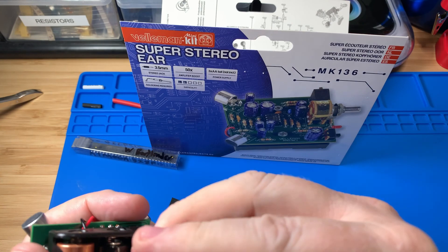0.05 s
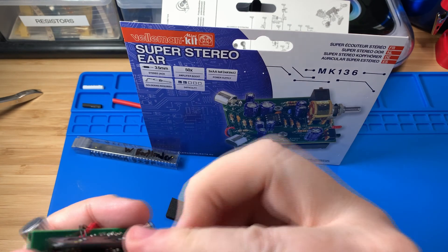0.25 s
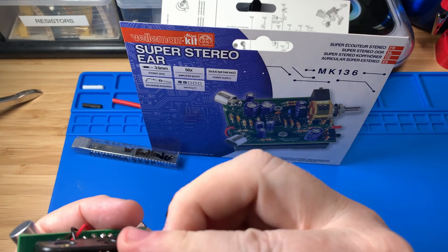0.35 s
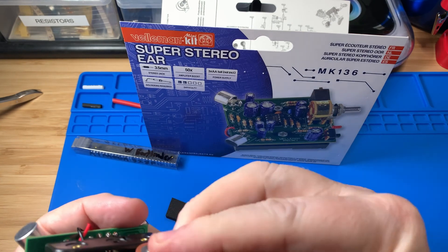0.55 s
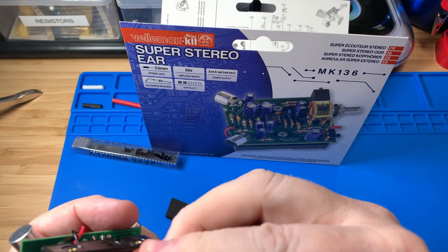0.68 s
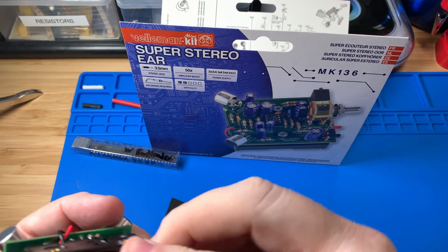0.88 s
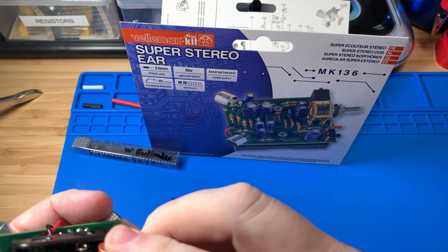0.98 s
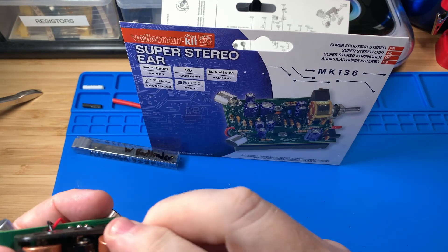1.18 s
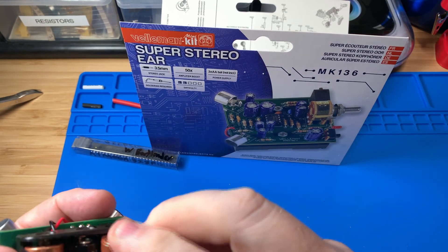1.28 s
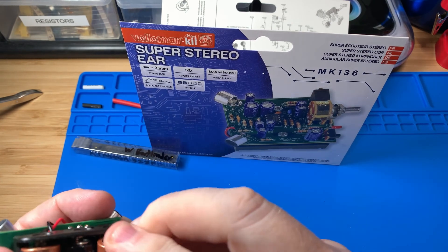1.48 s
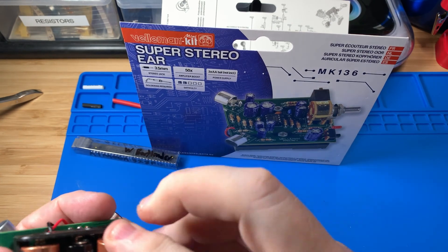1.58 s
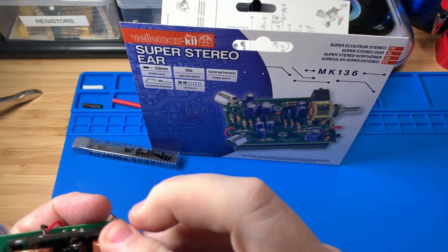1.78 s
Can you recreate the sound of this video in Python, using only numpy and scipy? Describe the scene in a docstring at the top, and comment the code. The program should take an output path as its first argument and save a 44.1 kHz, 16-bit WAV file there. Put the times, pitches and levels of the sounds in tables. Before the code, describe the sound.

Close in a small quiet room, a battery holder clacks hard twice in the first second, with short scrapes and dull finger rustle, then softer ticks and a springy ping follow above a wavering low hum.

```python
"""A small room: batteries are pushed into a plastic holder close to the microphone, a little to its right.
They scrape along the shell (random slips), tick against it (clicks with noisy rings) and twice snap home
(a click, flexing shell, ringing modes and a thud). Decaying sines make the board knock; swelling ones
make the contact spring twang. Fingers rustle dully in shaped noise. Dense decaying noise gives the room's
answer; a low hum, a wavering sine with odd overtones, swells and sags over soft room noise."""
import sys
import numpy as np
from scipy import signal
from scipy.fft import rfft, irfft, next_fast_len
from scipy.io import wavfile
from scipy.ndimage import map_coordinates

SR = 44100
rng = np.random.default_rng(int(sys.argv[2]) if len(sys.argv) > 2 else 0)


def transcribe(signal):
    """Save signal, clipped to [-1, 1], as a 16-bit WAV file at the path in sys.argv[1]."""
    frames = np.atleast_2d(signal).T
    limited = np.clip(frames, -1, 1)
    pcm = np.round(limited * 32767).astype(np.int16)
    wavfile.write(sys.argv[1], SR, pcm)


N = 81585  # length in samples

# Spectrum of the plastic shell when struck, relative: frequency_hz, level_db
STRUCK_SHELL = [(60, -24), (200, -23), (600, -22), (1300, -22.5), (2100, -18), (2550, -15.5), (2850, 6),
                (3800, -3), (4500, 5.5), (4900, -6.5), (6500, -11), (7800, -10), (8600, -11), (9800, -6.5),
                (11000, -11.5), (12300, -9.5), (13600, -12), (15500, -11), (17000, -46.5)]


def amp(db):
    """Decibels are twenty times the logarithm of an amplitude ratio; this returns the ratio."""
    return 10 ** (np.asarray(db) / 20)


def unit(x):
    """Normalisation by the root of the mean power gives rms 1."""
    return x / np.sqrt(np.mean(x ** 2) + 1e-20)


def along(points, hz):
    """Linear interpolation of (frequency_hz, value) points over logarithmic frequency."""
    f, v = np.transpose(points)
    return np.interp(np.log(hz + 1), np.log(f + 1), v)


def wobble(rate):
    """A cubic spline through random knots, rate of them a second, makes a smooth random curve."""
    knots = rng.standard_normal(int(N * rate / SR) + 4)
    return map_coordinates(knots, [np.arange(N) * rate / SR])


def filtered(x, response):
    """Linear filtering: the spectrum of x is multiplied by a complex response of frequency."""
    size = next_fast_len(N + SR // 2)
    spectrum = rfft(x, size) * response(np.fft.rfftfreq(size, 1 / SR))
    return irfft(spectrum, size)[..., :N]


def add(track, s, sound):
    """Superposition: a sound is summed into the track from time s, in seconds."""
    part = track[round(s * SR):][:len(sound)]
    part += sound[:len(part)]


def fade(t, t60):
    """Exponential decay by 60 dB in t60 seconds."""
    return np.exp(-np.log(1000) * t / t60)


def colour(spectrum, tone_db, size=2048):
    """Minimum phase: a folded cepstrum turns a level spectrum into a causal response of energy 1."""
    # Where a contact's colour is raised or lowered: frequency_hz
    tone_points_hz = [1500, 2900, 6000, 9500, 13500]
    body_low_hz, body_high_hz = 3575, 4509  # the shell's main band, left at 0 dB
    hz = np.fft.rfftfreq(size, 1 / SR)
    tone = sorted([*zip(tone_points_hz, tone_db), (body_low_hz, 0), (body_high_hz, 0)])
    level_db = along(spectrum, hz) + along(tone, hz)
    cepstrum = irfft(np.log(amp(level_db)))
    cepstrum[1:size // 2] *= 2
    cepstrum[size // 2 + 1:] = 0
    response = irfft(np.exp(rfft(cepstrum)))
    return response / np.linalg.norm(response)


def blow(body, t60, ring_db):
    """Impulsive excitation: a click and dense decaying noise drive the body's impulse response."""
    t = np.arange(SR // 8) / SR
    push = rng.standard_normal(len(t)) * fade(t, t60)
    push *= amp(ring_db) / np.linalg.norm(push)  # ring energy relative to the click
    push[0] += 1
    hit = signal.fftconvolve(push, body)[:len(t)]
    return hit / np.linalg.norm(hit) * np.sqrt(SR / 1000)  # energy of 1 ms at rms 1


def snaps():
    """Modal response to impact: a hard contact, a flexing shell, ringing modes and a thud in the hand."""
    # A battery snaps home: start_s, level_db, thud_db (relative to level_db),
    # then relative tone_db at 1500, 2900, 6000, 9500 and 13500 Hz
    snap_events = [(0.2569, -3.5, -44.5, 4, 2.2, 2.3, 1, 7),
                   (0.8596, -7, -30.5, -3.5, 1.9988, 1.65, 1.5, -10.5)]
    # Modes of the holder after a snap: frequency_hz, level_db (relative to the snap), t60_s
    holder_modes = [(550.8, -34.5, .03), (2885, -28.5, .025), (3496.6, -19, 0.043), (3760, -26, .035),
                    (4297.9, -33, 0.023), (6420, -32, .04), (7300, -30.5, 0.026)]
    crack_db, noise_t60_s, noise_ring_db = -3, 0.013, -2.5
    # the shell flexes just after the first contact
    flex_s, flex_width_s, flex_hz, flex_db = 0.00069802, 0.00042, 3741.5, 1
    thud_hz, thud_peak_s = 142.5, 0.006

    out, t = np.zeros(N), np.arange(SR // 8) / SR
    flex_envelope = np.exp(-((t - flex_s) / flex_width_s) ** 2)
    flex = flex_envelope * np.sin(2 * np.pi * flex_hz * (t - flex_s))
    thud_envelope = t / thud_peak_s * np.exp(1 - t / thud_peak_s)
    thud = thud_envelope * np.sin(2 * np.pi * thud_hz * t)
    ring = sum(amp(mode_db) * np.sin(2 * np.pi * hz * t) * fade(t, t60)
               for hz, mode_db, t60 in holder_modes)
    for s, db, thud_db, *tone_db in snap_events:
        crack = blow(colour(STRUCK_SHELL, tone_db), noise_t60_s, noise_ring_db)
        snap = amp(crack_db) * crack + amp(flex_db) * flex + ring + amp(thud_db) * thud
        add(out, s, amp(db) * snap)
    return out


def board():
    """Damped free vibration: the circuit board knocks, short and hollow, under the firmer pushes."""
    # Knocks of the board: start_s, pitch_hz, level_db, t60_s
    board_knocks = [(0.216, 996.9, -33.5, 0.01911), (.2568, 617.3, -28, 0.029345),
                    (0.8594, 962.6, -23.5, 0.019)]
    out, t = np.zeros(N), np.arange(SR // 8) / SR
    for s, hz, db, t60 in board_knocks:
        add(out, s, amp(db) * np.sin(2 * np.pi * hz * t) * fade(t, t60))
    return out


def ticks():
    """Impact excitation: lighter contacts drive the same shell, each with its own colour and decay."""
    # Light knocks of battery on shell: start_s, level_db, t60_s (of the driving noise),
    # then relative tone_db at 1500, 2900, 6000, 9500 and 13500 Hz
    tick_events = [(0.2173, -21.5, 0.01847, 22, 2, 12, 5, 0), (0.2291, -20, 0.0062, 14.5, 0, 10, 5, 24),
                   (.464, -42, 0.013, -6, -8.5, 2, 6, 1.5),
                   (.5738, -28.5, 0.008413, 0, -4.5, -9.5, -8.5, -2.5),
                   (.6099, -30, 0.008455, 9, -0.5, -9, -15.5, -5),
                   (.7445, -48.5, .02, -5, -0.5, -5, -0.5, -3), (1.016, -44, 0.02883, 7, 8, 13, 0.5, 3),
                   (1.3592, -40, 0.015367, -7.5, 13, -4.5, 18, 0),
                   (1.4035, -34.5, 0.018, -12, -8, -4, -0.5, -4.5), (1.406, -37, 0.018, 4, -0.5, -2, 6, -3),
                   (1.575, -25, 0.034795, 13.5, 2.5, 3.5, 14.5, 8),
                   (1.7728, -48, 0.0057, 2, -14, 7.5, -2, -3.5), (1.7836, -31, 0.0035, 9, -16.5, 15, 19, 1)]
    out = np.zeros(N)
    for s, db, t60, *tone_db in tick_events:
        add(out, s, amp(db) * blow(colour(STRUCK_SHELL, tone_db), t60, ring_db=6.5))
    return out


def scrapes():
    """Friction as many tiny random slips, coloured by the shell, under a stroke that rises and falls."""
    # A battery slides in the shell: peak_s, rise_s, fall_s (each to 1/e of the peak), level_db,
    # treble_db (relative, at 9500 Hz), top_db (relative, at 13500 Hz)
    slides = [(0.011, 0.027, 0.017, -54.5, -2, -9), (0.086, 0.0045, 0.01845, -60.5, 0, -3.5),
              (0.2014, .0075, 0.004409, -26.5, 4.5, 2), (.227, 0.003302, 0.003, -29, -4, 9.5),
              (.254, 0.01071, .004, -36.5, -16, 0.5), (0.486, 0.006716, 0.014826, -45.5, 1, -4.5),
              (0.507, 0.018915, 0.018274, -47, 0, -2.5), (0.594, .025, 0.031, -54, -19.5, 0.5),
              (0.691, 0.0064, .02, -57, 2.5, -2), (0.751, 0.0075, 0.034, -56, -3, -3),
              (.805, 0.0032, .006, -58, 18.5, -10.5), (0.857, 0.0044, 0.00902, -30.5, 2.5, -14),
              (0.88, 0.011, .025, -44.5, -5, -5), (0.946, 0.036, 0.019, -59, 3.5, -8.5),
              (1.231, 0.003295, 0.00895, -57.5, -0.5, 6.5), (1.253, 0.00546, 0.015, -57.5, -10.5, -4),
              (1.359, .004, 0.0064, -48, 1, 3.5), (1.412, .015, .025, -56, -34.5, -8.5),
              (1.59, 0.013, 0.023953, -52, -1.5, 5), (1.784, 0.008593, 0.01188, -57.5, -5.5, -2)]
    # Spectrum of the shell when rubbed, relative: frequency_hz, level_db
    rubbed_shell = [(100, -24), (1500, -23), (2300, -12), (3000, -6), (3700, -4), (4150, -1), (4550, -3),
                    (5000, -5), (5700, -12), (6700, -7.5), (8600, -16.5), (9800, -12.5), (12000, -11),
                    (13600, -18.5), (15200, -12.5), (17000, -48)]
    slips_per_s, noise_share = 1500, 0.75  # smooth noise relative to slips of rms 1

    out, t = np.zeros(N), np.arange(N) / SR
    for s, rise, fall, db, treble_db, top_db in slides:
        slips = unit(rng.standard_normal(N) * (rng.random(N) < slips_per_s / SR))
        friction = slips + noise_share * rng.standard_normal(N)
        body = colour(rubbed_shell, (0, 0, 0, treble_db, top_db))
        rub = unit(signal.oaconvolve(friction, body)[:N])
        stroke = np.exp(-np.abs((t - s) / np.where(t < s, rise, fall)) ** 1.0976)
        out += amp(db) * stroke * rub
    return out


def spring():
    """Resonance of a coil: it sings up briefly as a battery drags over it, then rings on faintly."""
    # Twangs of the contact spring: start_s, pitch_hz, level_db
    twang_events = [(1.405, 4497, -36.5), (1.5767, 4483, -22.5)]
    swell_peak_s, swell_width_s = 0.0018, 0.004
    tail_t60_s, tail_db = 0.0334, -20  # level relative to the swell
    roughness_rad = 0.39  # random phase, per unit of wobble

    out, t = np.zeros(N), np.arange(SR // 4) / SR
    swell = np.exp(-((t - swell_peak_s) / swell_width_s) ** 2)
    envelope = swell + amp(tail_db) * fade(t, tail_t60_s)
    for s, hz, db in twang_events:
        phase = 2 * np.pi * hz * t + roughness_rad * wobble(802.6)[:len(t)]
        add(out, s, amp(db) * envelope * np.sin(phase))
    return out


def hands():
    """Spectrally shaped noise: the dull rustle of fingers working on the holder."""
    # Spectrum of the rustle, relative: frequency_hz, level_db
    rustle_spectrum = [(30, -8.5), (100, -3.5), (170, 0.5), (300, -8), (550, -11.5), (1200, -23.5),
                       (3000, -42.5)]
    # Course of the rustle before its random wavering: time_s, level_db
    rustle_course = [(0, -45), (0.129, -61), (.25, -45), (.4, -58.5), (.55, -52), (.78, -66), (.87, -47),
                     (.95, -73.5), (1.85, -70)]
    rustle = unit(filtered(rng.standard_normal(N), lambda hz: amp(along(rustle_spectrum, hz))))
    level_db = np.interp(np.arange(N) / SR, *np.transpose(rustle_course))
    return rustle * amp(level_db + 1.5 * wobble(30))


def room(x):
    """Reverberation as decaying noise: quick bench reflections, then a tail whose decay varies with pitch."""
    # Decay of the room's tail: frequency_hz, t60_s
    tail_decay = [(200, .25), (1500, 0.21), (3000, .19), (4300, 0.27), (7000, 0.25), (15000, 0.11)]
    # Colour of the sound sent into the room, relative: frequency_hz, level_db
    sent_colour = [(300, -9), (1200, 0), (2500, 1), (3200, 0), (4300, -1.5), (6500, -2), (14000, -5.5)]
    tail_db, bench_db, bench_t60_s = -21.5, -11, 0.052

    hz, t, bands = signal.stft(rng.standard_normal((2, SR // 2)), SR, nperseg=256)
    bands = bands * fade(t, along(tail_decay, hz)[:, None])
    tail = signal.istft(bands, SR, nperseg=256)[1]
    t = np.arange(tail.shape[1]) / SR
    early = rng.standard_normal(tail.shape) * fade(t, bench_t60_s)
    # both parts are scaled by the energy of their left channel
    answer = amp(tail_db) * tail / np.linalg.norm(tail[0])
    answer += amp(bench_db) * early / np.linalg.norm(early[0])
    sent = filtered(x, lambda hz: amp(along(sent_colour, hz)))
    return signal.fftconvolve(sent[None], answer, axes=1)[:, :N]


def hum():
    """Harmonic synthesis: a wavering low tone swells and sags over faint odd overtones of steady level."""
    # Course of the fundamental, rms before the stereo balance: time_s, level_db
    hum_course = [(0.0, -42.5), (0.164, -44.5), (0.2, -57.5), (0.246, -42), (0.282, -51), (0.328, -46),
                  (0.704, -39.5), (0.85, -53.5), (0.886, -48), (0.926, -68.5), (1.046, -38.5), (1.076, -45),
                  (1.298, -41.5), (1.328, -54), (1.52, -41.5), (1.612, -45), (1.73, -43), (1.85, -50.5)]
    # Overtones, rms before the stereo balance: multiple, level_db
    odd_overtones = [(3, -62), (5, -71)]
    pitch_hz, waver_hz, left_db = 56.029, 0.46, -2.0721  # the right channel takes the opposite gain

    phase = 2 * np.pi * np.cumsum(pitch_hz + waver_hz * wobble(9.8)) / SR
    level_db = np.interp(np.arange(N) / SR, *np.transpose(hum_course))
    tone = amp(level_db) * np.sin(phase)
    for multiple, db in odd_overtones:
        tone += amp(db) * np.sin(round(multiple) * phase + wobble(5))  # phase wanders
    return np.sqrt(2) * tone * amp([[left_db], [-left_db]])


def air():
    """Partial coherence: mid and side noises mix into room noise alike in both channels in the bass only."""
    # Spectrum of the room noise, relative: frequency_hz, level_db
    air_spectrum = [(20, -17), (45, 2.5), (90, 6), (150, -5.5), (260, -4.5), (380, -20.5), (600, -15.5),
                    (950, -15.5), (1400, -28.5), (2500, -32.5), (4500, -37.5), (7000, -38), (8600, -47),
                    (11000, -29.5), (13600, -46), (15200, -36.5)]
    # Likeness of left and right: frequency_hz, correlation
    likeness = [(50, 0.93), (150, .85), (300, 0.8598), (600, 0), (1200, 0), (8000, 0)]

    def mid_and_side(hz):
        """The cosine of twice the mixing angle is the correlation of the channels."""
        angle = np.arccos(np.clip(along(likeness, hz), -1, 1)) / 2
        return amp(along(air_spectrum, hz)) * [np.cos(angle), np.sin(angle)]

    mid, side = filtered(rng.standard_normal((2, N)), mid_and_side)
    return amp(-51) * unit(np.array([mid + side, mid - side]))


def scene():
    """Interchannel phase and level: the stereo phone gives the holder's direct sound a phase difference
    between left and right that depends on frequency, the right a little louder."""
    # Phase by which the left channel leads: frequency_hz, lead_rad
    left_lead = [(100, 0), (900, 2.5), (1640, 2), (2150, 0.1868), (2410, -2.5), (3700, -0.4251), (5340, 2),
                 (6890, -0.09), (12500, -8), (16000, -12)]
    left_db = -1.5  # direct sound, relative to the right channel
    holder = snaps() + board() + ticks() + scrapes() + spring() + hands()
    left = amp(left_db) * filtered(holder, lambda hz: np.exp(1j * along(left_lead, hz)))
    return np.array([left, holder]) + room(holder) + hum() + air()


def record(dry):
    """Clipping and band limiting: the recorder clips at full scale and keeps only what is below 16 kHz."""
    return filtered(np.clip(dry, -1, 1), lambda hz: hz < 16000)


dry = scene()
out = record(dry)
transcribe(out)
```